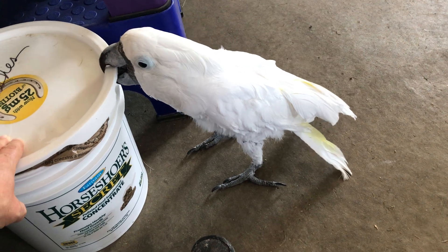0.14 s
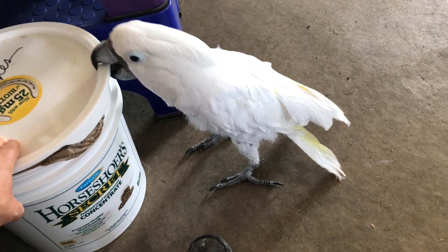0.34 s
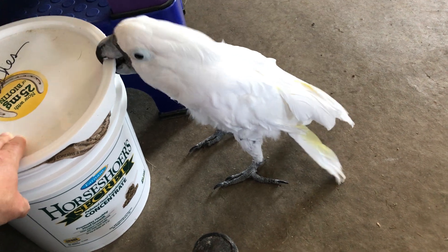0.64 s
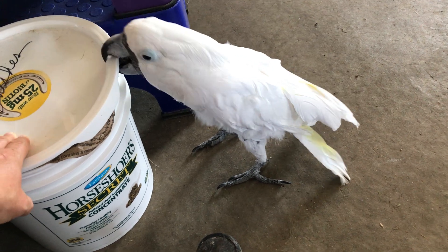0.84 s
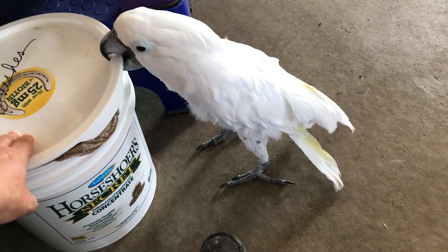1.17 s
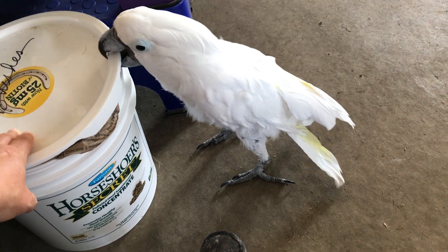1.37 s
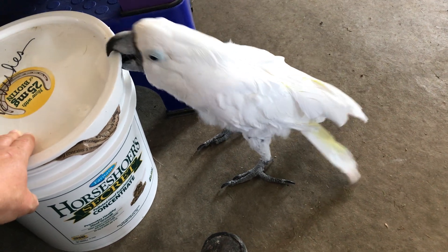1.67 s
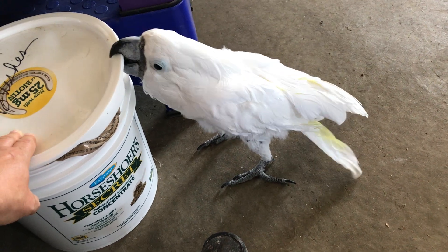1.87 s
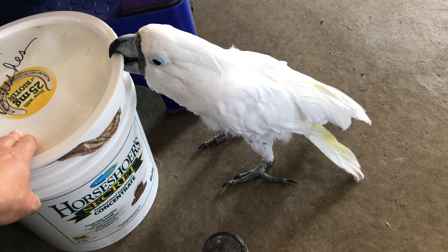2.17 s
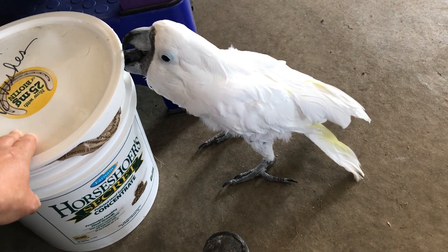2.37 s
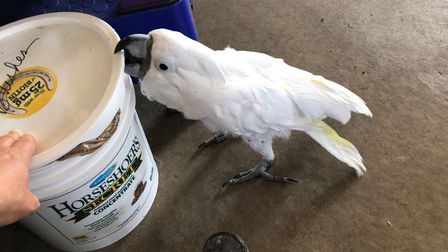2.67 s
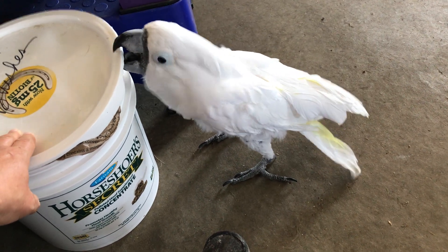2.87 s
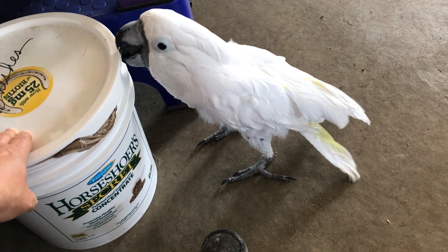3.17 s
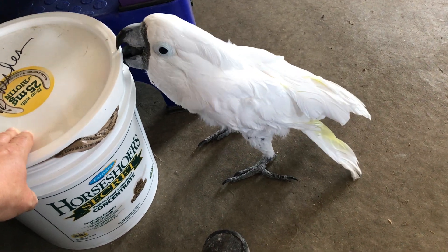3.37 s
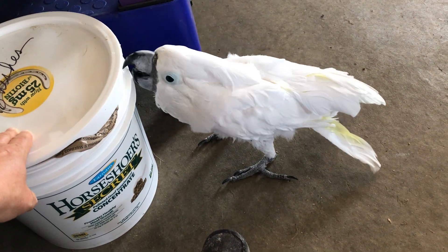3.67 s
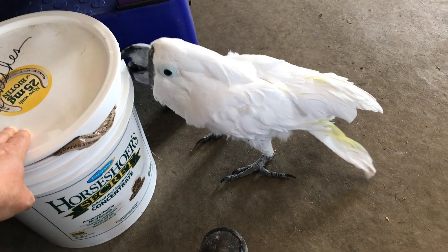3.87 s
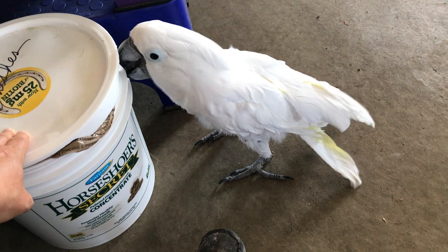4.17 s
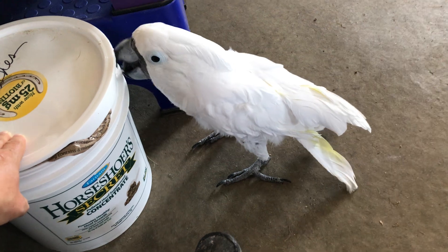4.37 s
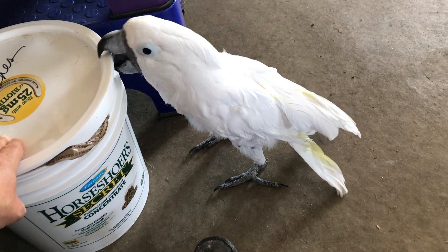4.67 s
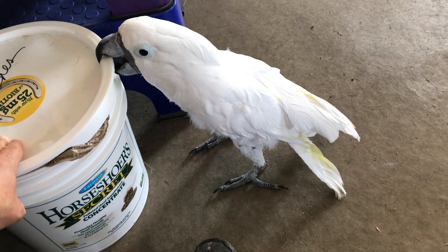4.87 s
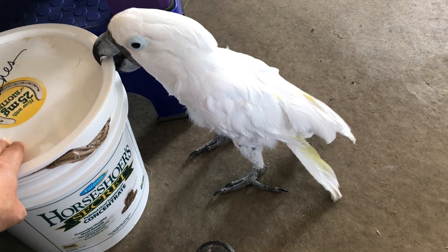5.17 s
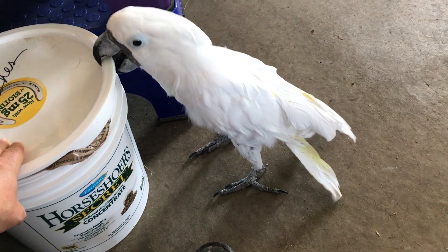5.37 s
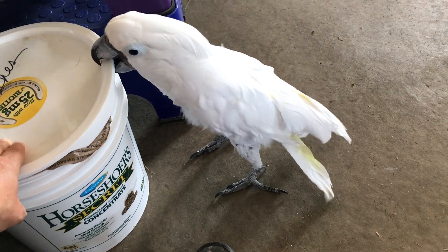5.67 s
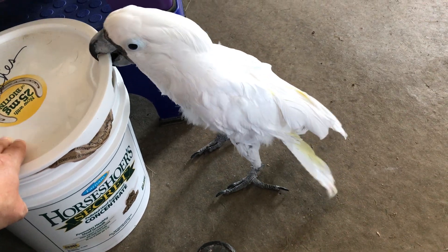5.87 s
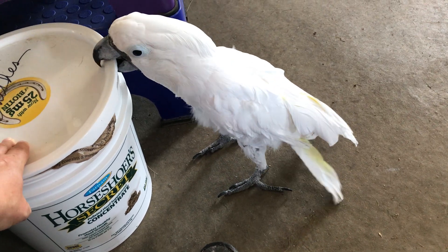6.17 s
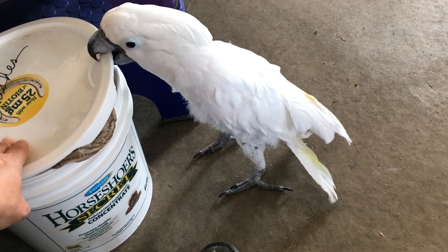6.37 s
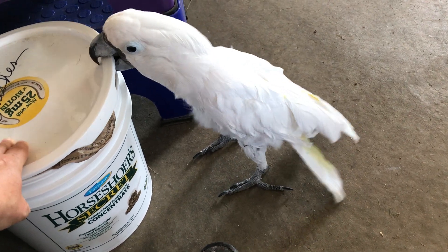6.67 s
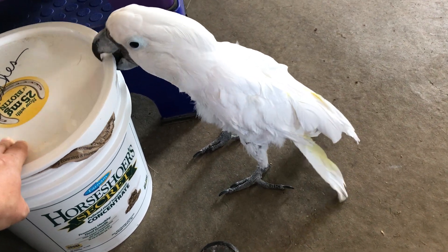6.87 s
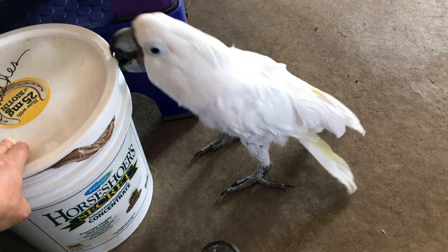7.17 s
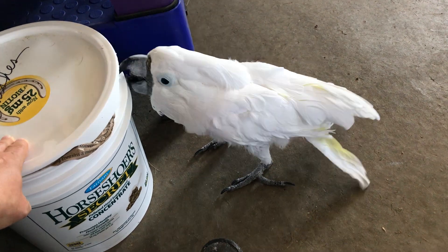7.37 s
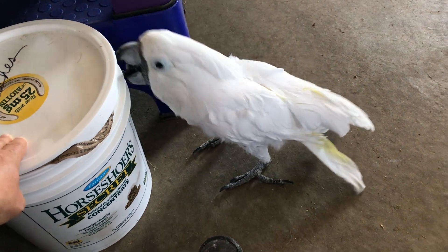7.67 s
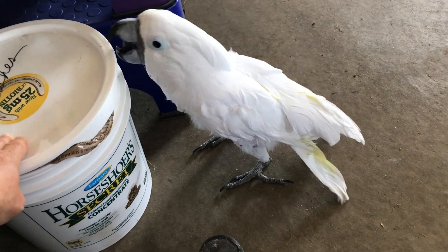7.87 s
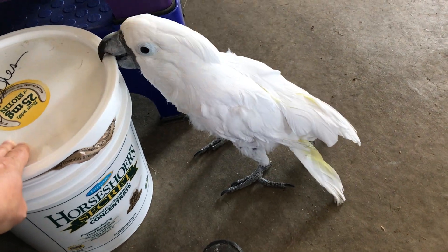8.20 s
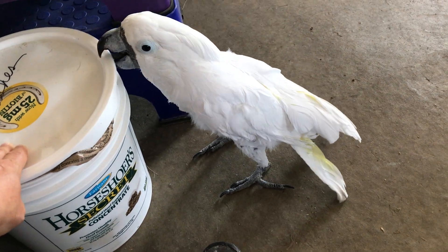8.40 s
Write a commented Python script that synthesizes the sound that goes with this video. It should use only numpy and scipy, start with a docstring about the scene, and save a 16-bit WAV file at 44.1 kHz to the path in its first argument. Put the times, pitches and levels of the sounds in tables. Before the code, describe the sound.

A large parrot's beak taps, scrapes and pries at a plastic pail lid in irregular clicks and hollow knocks, with faint distant bird whistles.

```python
"""A cockatoo is already tapping and rubbing at the rim of a plastic pail's lid. From about one second a songbird
whistles four times far outside. A hard tug and knock come just after three seconds, then closer tapping; after a
lull near six seconds the hardest blows fall, and two faint taps end it. Blows ring a horn tick, a hollow rim and a
lid over air; the sliding beak sets them going by tiny slips. Still air hisses and a garage echoes throughout."""
import sys
import numpy as np
from scipy import signal
from scipy.fft import rfft, irfft, next_fast_len
from scipy.io import wavfile
from scipy.ndimage import uniform_filter1d, map_coordinates

SR = 44100
rng = np.random.default_rng(int(sys.argv[2]) if len(sys.argv) > 2 else 0)


def file_out(sig):
    """Save sig as 16-bit WAV at sys.argv[1]."""
    # one column per channel
    cols = np.atleast_2d(sig).T
    # limit, then scale
    lim = np.clip(cols, -1, 1)
    pcm = np.round(lim * 32767).astype(np.int16)
    wavfile.write(sys.argv[1], SR, pcm)


N = 376613
TOP_HZ = 16000  # upper limit of the microphone

# strokes of the sliding beak:
# (start [s], length [s], force before layer gains [dB], rasp before layer gains [dB])
STROKES = [(0, 0.059, -38, -64.5), (0.053, 0.11, -49.5, -58.5), (0.173, 0.16, -51.5, -67.5),
           (0.534, .03, -53.5, -98), (0.578, 0.052, -41, -69), (0.63, 0.053, -36, -57.5),
           (0.708, 0.123, -57, -76.5), (0.953, 0.026, -44, -77), (1.209, 0.019, -44.5, -86),
           (1.237, 0.11, -42, -65.5), (1.374, 0.058, -42.5, -74.5), (1.556, 0.047, -51, -85),
           (1.822, 0.094, -42, -64.5), (1.916, 0.064, -54, -72.5), (2.347, 0.064, -61, -91),
           (2.634, 0.14, -51.5, -71.5), (2.856, .1, -43.5, -71), (2.953, 0.052, -43, -63.5),
           (3.078, 0.078, -44.5, -61.5), (4.376, 0.063, -55, -66), (4.437, 0.1, -44, -70),
           (4.956, 0.051, -55.5, -111), (5.234, 0.16, -77, -80), (5.41, 0.076, -50.5, -81),
           (5.596, 0.043, -33, -60.5), (5.744, 0.35, -73, -73.5), (6.259, 0.058, -56, -66),
           (6.634, 0.069, -59.5, -63), (6.713, 0.056, -57, -69), (6.802, 0.029, -36, -69),
           (6.926, 0.054, -42.5, -60), (7.24, .02, -52, -67), (7.271, 0.024, -44.5, -77),
           (7.768, 0.043, -50.5, -74), (7.802, 0.071, -42, -64), (8.025, 0.048, -50.5, -78),
           (8.363, 0.043, -61.5, -84)]
# ringing tones of the lid and the air under it: (frequency [Hz], relative level [dB], time to fall 60 dB [s])
LID_MODES = [(80, -10, 0.17), (129.2, -3.5, 0.063), (170.9, -5.5, 0.11), (208, -6, 0.047),
             (280, -5.5, 0.082), (327, -8.5, 0.085), (412.4, 0, 0.071)]
# ringing tones of the stiff rim: (frequency [Hz], relative level [dB], time to fall 60 dB [s])
RIM_MODES = [(625, -8, 0.04), (690, 2.5, 0.025), (755, -1.5, 0.034), (880, 4, 0.018), (982, -2.5, 0.031),
             (1258, -9.5, 0.044), (1371, 6.5, 0.016), (1560, 2, 0.017), (1830, -3.5, 0.015),
             (2092, -16, 0.033), (2606, -14, 0.029), (3013, -9.5, 0.023), (3454, -9.5, 0.016)]
# colour of the horn's tick: (frequency [Hz], relative level [dB per Hz])
TICK_SPECTRUM = [(300, -117), (1500, 10.5), (2800, -2.5), (4400, -6.5), (5500, -6.5), (6300, -3),
                 (6800, -9), (7300, -3), (8000, -10.5), (8700, -8.5), (10500, -17), (15500, -22.5)]
# colour of the bright edge of the beak: (frequency [Hz], relative level [dB per Hz])
EDGE_SPECTRUM = [(1000, -28), (3000, 0), (4500, -2.5), (6300, 9), (7600, 3), (8900, 7), (10500, -3),
                 (13000, 2), (15500, 0)]


def amp(db):
    """Turns decibels into a gain."""
    return 10 ** (np.asarray(db) / 20)


def unit(x):
    """Scales a sound to an rms of 1."""
    return x / np.sqrt(np.mean(x ** 2) + 1e-20)


def crest(x, size):
    """Scales a sound so that its loudest stretch of size samples has an rms of 1."""
    loudest_power = uniform_filter1d(x ** 2, size, mode="constant").max()
    return x / np.sqrt(loudest_power + 1e-20)


def along(points, hz):
    """Reads a value between (Hz, value) points, on a log frequency axis."""
    f, v = np.transpose(points)
    return np.interp(np.log(hz + 1), np.log(f + 1), v)


def filtered(x, response):
    """Multiplies the spectrum of x by a function of frequency."""
    size = next_fast_len(len(x) + 8192)
    spectrum = rfft(x, size) * response(np.fft.rfftfreq(size, 1 / SR))
    return irfft(spectrum, size)[:len(x)]


def coloured(x, spectrum):
    """Gives x a colour from a spectrum table, at an rms of 1."""
    return unit(filtered(x, lambda hz: amp(along(spectrum, hz))))


def add(track, s, sound):
    """Mixes a sound into the track at s seconds."""
    start = max(round(s * SR), 0)
    part = track[start:start + len(sound)]
    part += sound[:len(part)]


def ring(modes, attack, scatter_db, centre_hz, focus_db, disorder):
    """Struck modes die away together; those near the centre ring most (focus in dB per squared octave)."""
    hz, db, t60 = np.transpose(modes)[..., None]
    t = np.arange(SR // 6) / SR
    # each strike lands on a new spot, so levels scatter and phases differ by up to disorder cycles
    scatter = scatter_db * rng.standard_normal(hz.shape)
    gain = amp(db + scatter - focus_db * np.log2(hz / centre_hz) ** 2)
    waves = np.sin(2 * np.pi * (hz * t + disorder * rng.random(hz.shape)))
    decay = np.exp(-np.log(1000) * t / t60)
    onset = 1 - np.exp(-(t / attack) ** 2)
    return (gain * waves * decay).sum(0) * onset


def snap(spectrum, t60):
    """Many heavily damped modes at once: coloured noise that dies away quickly."""
    t = np.arange(SR // 6) / SR
    noise = coloured(rng.standard_normal(len(t)), spectrum)
    return crest(noise * np.exp(-np.log(1000) * t / t60), size=88)


def slips(rate, spread_db):
    """Stick-slip: tiny impulses of uneven size at random moments, rate per second."""
    happens = rng.random(N) < rate / SR
    return happens * rng.standard_normal(N) * amp(spread_db * rng.standard_normal(N))


def grit(rate, spread_db, life):
    """Slips that each set off a burst of noise; its energy fades with a time constant of life seconds."""
    power = signal.lfilter([1], [1, -np.exp(-1 / (life * SR))], slips(rate, spread_db) ** 2)
    return np.sqrt(power) * rng.standard_normal(N)


def driven(force, modes, centre_hz, focus_db):
    """Modes kept going by a rubbing force that is strongest near the centre."""
    mode_hz, db, t60 = np.transpose(modes)[..., None]
    half_width_hz = np.log(1000) / (2 * np.pi * t60)  # quickly damped modes have broad peaks

    def response(hz):
        peaks = amp(db) ** 2 / (1 + ((hz - mode_hz) / half_width_hz) ** 2)
        return np.sqrt(peaks.sum(0)) * amp(-focus_db * np.log2((hz + 1) / centre_hz) ** 2)

    return unit(filtered(force, response))


def by_reach(s, on_rim, over_lid):
    """A value between its two ends, for where the beak bears at s seconds."""
    # (time [s], reach [0 = on the stiff rim, 1 = hooked over onto the soft lid])
    reach_points = [(.26, 0.84), (.37, 0.29), (.6, 0.91), (1.4, 0.79), (1.53, 0.64), (1.77, 0.51),
                    (1.86, 0.79), (2.3, 0.52), (2.9, 0.81), (3.12, 0.52), (3.18, 0), (3.95, 0.37),
                    (4.19, 0.88), (4.42, 0), (5.04, 0.99), (5.36, 0.49), (5.48, 0.92), (6.08, 0.66),
                    (6.96, 0.62), (7.15, 0), (7.99, 0.11), (8.12, 0.41)]
    reach = np.clip(np.interp(s, *np.transpose(reach_points)), 0, 1)
    return on_rim + reach * (over_lid - on_rim)


def still_air():
    """The air of the garage: steady noise, strongest in the bass."""
    # colour of the air: (frequency [Hz], relative level [dB per Hz])
    air_spectrum = [(15, -49), (25, -8), (59, 7), (180, -5), (293, -4.5), (489, -14.5), (1070, -16.5),
                    (1330, -16), (2550, -23), (5000, -27), (6210, -27), (7710, -28.5), (14800, -30.5),
                    (16000, -55.5)]
    return amp(-64) * coloured(rng.standard_normal(N), air_spectrum)


def garage(x, count=25):
    """Diffuse echo: in each band the walls store energy and let it die away, the highest treble soonest."""
    # how strongly the garage answers: (frequency [Hz], level [dB])
    echo_levels = [(60, -7), (115, -2.5), (180, -3), (280, -0.5), (500, 1), (1200, -9), (2000, -6),
                   (3000, -3), (7000, -9.5), (14000, -11.5)]
    # how long the echo lasts: (frequency [Hz], time to fall 60 dB [s])
    echo_times = [(100, 0.59), (300, 0.38), (1200, 0.61), (4000, 0.56), (12000, 0.25)]
    size = next_fast_len(N + 8192, real=True)
    hz = np.fft.rfftfreq(size, 1 / SR)
    centres = np.geomspace(60, TOP_HZ, count)
    place = np.log((hz + 1) / centres[0]) / np.log(centres[1] / centres[0])  # counted in bands
    source, noise = rfft(x, size), rfft(rng.standard_normal(size))
    out = np.zeros(N)
    for k, centre in enumerate(centres):
        band = np.sqrt(np.maximum(1 - abs(place - k), 0))
        power = (irfft(source * band, size)[:N] * amp(along(echo_levels, centre))) ** 2
        keep = np.exp(-2 * np.log(1000) / (along(echo_times, centre) * SR))  # energy left after one sample
        stored = signal.lfilter([1 - keep], [1, -keep], power)
        out += np.sqrt(stored) * unit(irfft(noise * band, size)[:N])
    return out


def songbird():
    """Pairs of thin falling whistles that waver a little, the second lower than the first."""
    # pairs of whistles: (time [s], starting pitch of the first whistle before its waver [Hz], level [dB])
    whistles = [(.98, 2460, -77), (1.51, 2570, -72.5), (2.1, 2590, -75.5), (3.35, 3260, -84)]
    note_s, gap_s = 0.153, .15  # length of a whistle; from the first start to the second
    sag, drop = 0.055, 0.17  # share of pitch lost within a whistle; that the second lies below the first
    n = round(note_s * SR)
    out = np.zeros(N)
    for s, first_hz, db in whistles:
        for k in range(2):
            waver = map_coordinates(rng.standard_normal(16), [np.linspace(0, 15, n)])
            glide = np.linspace(1, 1 - sag, n)
            hz = first_hz * (1 - k * drop) * glide * (1 + 0.0061 * waver)
            tone = np.sin(2 * np.pi * np.cumsum(hz) / SR)
            add(out, s + k * gap_s, amp(db) * signal.windows.tukey(n, .6) * tone)
    return out


def nibbles():
    """The beak never quite rests: sparse, faint ticks of its edge, 15 a second on average."""
    return amp(-84.5) * coloured(grit(rate=15, spread_db=3.5, life=.002), EDGE_SPECTRUM)


def bumps():
    """The lid springs back or the whole pail rocks: a low tone swells and dies within a few swings."""
    # (time [s], level [dB], frequency of the swing [Hz])
    swings = [(.002, -28, 117), (0.044, -35, 123), (3.125, -20, 147), (5.604, -33.5, 72.4),
              (6.958, -33, 72)]
    rise_cycles = 0.57  # swings until a bump is at its fullest
    out, t = np.zeros(N), np.arange(SR // 4) / SR
    for s, db, hz in swings:
        age = t * hz / rise_cycles
        swell = age * np.exp(1 - age)
        add(out, s, amp(db) * swell * np.sin(2 * np.pi * hz * t))
    return out


def rubs():
    """Slips under each stroke shake the lid, rattle the rim and rasp on the horn."""
    # colour of the rasp: (frequency [Hz], relative level [dB per Hz])
    rasp_spectrum = [(1000, -20), (2700, -3.5), (4600, -2), (5600, 0.5), (6300, 6), (6800, 3), (7300, 1.5),
                     (8000, 3), (9000, 2.5), (10300, -6), (12000, -1), (15500, -7.5)]
    # colour of the horn singing when it is dragged hard: (frequency [Hz], relative level [dB per Hz])
    horn_spectrum = [(2000, -16), (2700, -1), (3300, -20), (4800, -25.5), (5300, -2), (6200, -1),
                     (6700, -8), (7300, -4), (8200, -12.5), (14000, -17)]
    # how strongly each part is rubbed, moment by moment
    lid_force, rim_force, rasp_force = np.zeros((3, N))
    for start, length, force_db, rasp_db in STROKES:
        stroke = signal.windows.tukey(max(round(length * SR), 2), .45)
        middle = start + length / 2
        lid_db = force_db + by_reach(middle, on_rim=-11.5, over_lid=0.5)
        rim_db = force_db + by_reach(middle, on_rim=1.5, over_lid=-16.5)
        for track, db in zip((lid_force, rim_force, rasp_force), (lid_db, rim_db, rasp_db)):
            add(track, start - .003, amp(db) * stroke)
    coarse = slips(rate=660, spread_db=4.5)
    rumble = lid_force * driven(coarse, LID_MODES, centre_hz=161, focus_db=10.5)
    crunch = amp(-11) * coloured(grit(rate=440, spread_db=1.5, life=0.0015), TICK_SPECTRUM)
    scuff = rim_force * (driven(coarse, RIM_MODES, centre_hz=1100, focus_db=0) + crunch)
    rasp = rasp_force * coloured(grit(rate=400, spread_db=5, life=.0013), rasp_spectrum)
    # hard strokes lock into a fast chatter of the rim, and the horn sings; grip is 0 for light, near 1 for hard
    grip = rim_force ** 2 / (rim_force ** 2 + amp(-56.5) ** 2)
    chatter = rim_force * driven(slips(rate=2500, spread_db=1), RIM_MODES, centre_hz=1020, focus_db=22)
    horn = rim_force * coloured(grit(rate=800, spread_db=3, life=0.007), horn_spectrum)
    pressed = chatter + amp(-10) * scuff + amp(-11.5) * horn
    return amp(0.5) * rumble + amp(7.5) * rasp + (1 - grip) * scuff + grip * pressed


def nips(count=16):
    """The sharp edge of the beak catches and lets go, too lightly to move the lid."""
    # the clearest clicks of the edge: (time [s], level [dB])
    clear_clicks = [(.11, -42), (.135, -44), (.452, -59.5), (1.158, -55.5), (1.462, -53), (1.562, -48.5),
                    (1.834, -43), (1.933, -51), (2.707, -43.5), (2.81, -49), (3.543, -32), (5.783, -53.5),
                    (5.84, -51.5), (5.888, -47.5), (5.99, -57), (6.29, -48), (6.39, -50), (6.458, -52.5),
                    (6.518, -55.5)]
    edge_t60_s = 0.015  # how quickly the edge falls silent
    # the edge also catches at random within a stroke: how often, and how loud against the stroke's rasp column
    catches_per_s, catch_db, scatter_db = 25, 2.5, 3
    out = np.zeros(N)
    for s, db in clear_clicks:
        add(out, s, amp(db) * snap(EDGE_SPECTRUM, t60=edge_t60_s))
    for start, length, _, rasp_db in STROKES:
        delays = np.cumsum(rng.exponential(size=count)) / catches_per_s
        levels = rasp_db + catch_db + scatter_db * rng.standard_normal(count)
        click = snap(EDGE_SPECTRUM, t60=edge_t60_s)
        for delay, db in zip(delays[delays < length], levels):
            add(out, start + delay, amp(db) * click)
    return out


def taps():
    """The tick comes first, then the rim clacks, then the slow lid swings, more so when the beak reaches over."""
    # beak blows: (time [s], clack level [dB], clack centre [Hz], horn tick level [dB])
    blows = [(.002, -41.5, 1303, -45), (.039, -40.5, 950, -54), (0.248, -34, 980, -45),
             (.371, -33.5, 1590, -45.5), (0.586, -38.5, 1150, -51), (0.597, -38, 900, -52),
             (0.733, -38, 1210, -52), (.851, -47, 1210, -60), (0.908, -45.5, 890, -61),
             (1.526, -40.5, 1370, -56), (1.778, -39, 870, -52), (1.862, -35.5, 1390, -42),
             (2.314, -39.5, 1240, -48), (2.424, -49.5, 790, -66), (2.526, -45.5, 1200, -60),
             (2.599, -41.5, 840, -64), (2.91, -45.5, 820, -72), (2.963, -46.5, 1090, -56),
             (3.119, -20.5, 1620, -34.5), (3.171, -32, 890, -39.5), (3.218, -42, 920, -65),
             (3.518, -44, 950, -58.5), (3.543, -30, 1240, -32), (3.638, -34, 920, -32),
             (3.685, -38.5, 1240, -70), (3.702, -32.5, 1470, -57), (3.801, -42.5, 1300, -56.5),
             (3.853, -38.5, 1400, -65), (3.885, -43.5, 1450, -74), (3.958, -48, 724, -49.5),
             (4.006, -47.5, 844, -60), (4.062, -47, 900, -59), (4.169, -45, 1250, -49.5),
             (4.193, -42, 760, -50.5), (4.237, -45, 1450, -55), (4.391, -33.5, 1140, -46.5),
             (4.417, -35.5, 855, -50), (4.481, -35, 935, -52), (4.595, -31.5, 1070, -58),
             (4.641, -33.5, 1540, -44), (4.728, -29, 1000, -41), (4.795, -41.5, 1570, -61),
             (5.037, -43, 1170, -47.5), (5.214, -41.5, 1570, -54), (5.3677, -26, 1110, -47),
             (5.479, -37.5, 706, -58), (5.607, -34, 1240, -37.5), (5.909, -51.5, 935, -70),
             (6.0702, -31, 1310, -43), (6.0797, -24.5, 1590, -33), (6.684, -23, 1510, -33.5),
             (6.813, -39, 1011, -47), (6.958, -20, 1450, -31.5), (7.101, -39, 860, -55.5),
             (7.227, -34.5, 1000, -46), (7.297, -26, 1260, -28.5), (7.372, -32.5, 1010, -33),
             (7.4, -35, 1220, -62), (7.424, -32, 1280, -66), (7.496, -44.5, 880, -53.5),
             (7.634, -33, 1320, -46.5), (7.692, -32, 970, -37), (7.78, -35.5, 930, -60),
             (7.803, -34.5, 960, -69), (7.825, -36.5, 930, -56), (7.933, -28.5, 1240, -37),
             (7.991, -33.5, 1660, -50), (8.117, -32, 1110, -45.5), (8.42, -51, 830, -78),
             (8.46, -48.5, 1340, -78)]
    # colour of the rim's broad, quickly damped give: (frequency [Hz], relative level [dB per Hz])
    shell_spectrum = [(150, -57), (330, 29), (490, -13.5), (680, 12), (1000, -48.5), (1130, -0.5),
                      (1400, 13), (2000, -12), (3000, -13.5), (5000, -23.5), (9000, -55)]
    # the thump is deeper where the lid is slack, higher near the stiff edge: (time [s], thump centre [Hz])
    thump_centres = [(0, 168), (1.4, 184), (2.5, 243), (3.12, 156), (3.6, 292), (4.45, 269), (5.55, 166),
                     (6.1, 208), (7, 225), (7.4, 293), (8.1, 240)]
    # a small panel radiates little below its lowest mode
    panel_cut = signal.butter(2, 85, "highpass", fs=SR, output="sos")
    out = np.zeros(N)
    for s, clack_db, clack_hz, tick_db in blows:
        thump_db = clack_db + by_reach(s, on_rim=-16, over_lid=1.5)
        thump_hz = np.interp(s, *np.transpose(thump_centres))
        rim = ring(RIM_MODES, attack=0.0024, scatter_db=3.5, centre_hz=clack_hz, focus_db=12, disorder=0.39)
        give = amp(-9) * snap(shell_spectrum, t60=.035)
        clack = crest(crest(rim, size=110) + give, size=110)
        swing = ring(LID_MODES, attack=0.0017, scatter_db=4.0, centre_hz=thump_hz, focus_db=14.5, disorder=0.42)
        thump = crest(signal.sosfilt(panel_cut, swing), size=440)
        add(out, s - .0006, amp(tick_db) * snap(TICK_SPECTRUM, t60=0.024))
        add(out, s - .0003, amp(clack_db) * clack)
        add(out, s + 0.0015, amp(thump_db) * thump)
    return out


def scene():
    """The pail close by, the songbird far off, and the echo and still air of the garage."""
    bird = songbird()
    pail = nibbles() + bumps() + rubs() + nips() + taps()
    echo = garage(amp(-9) * pail + amp(3) * bird)  # the far bird is heard more through the echo
    return (pail + bird + echo + still_air())[None]


def record(dry):
    """The microphone sheds the deep bass and keeps nothing above its upper limit."""
    low_cut = signal.butter(2, 48, "highpass", fs=SR, output="sos")  # 48 Hz
    thin = signal.sosfilt(low_cut, dry)
    return np.array([filtered(x, lambda hz: hz < TOP_HZ) for x in thin])


dry = scene()
out = record(dry)
file_out(out)
```